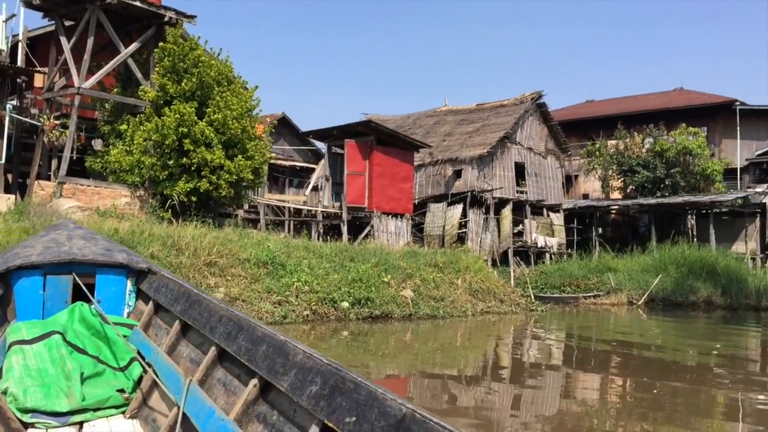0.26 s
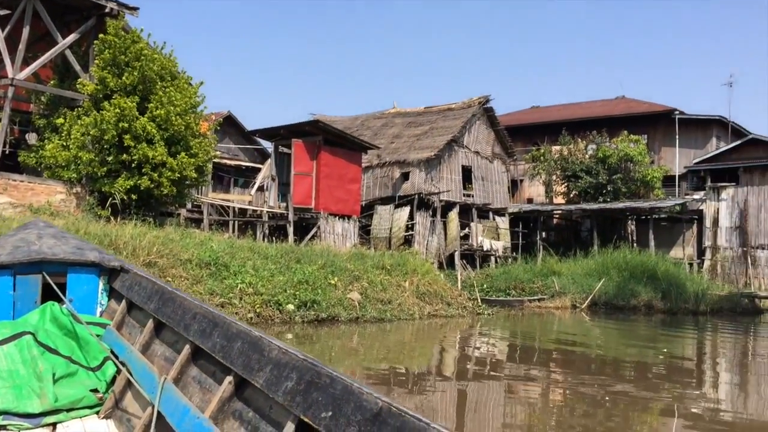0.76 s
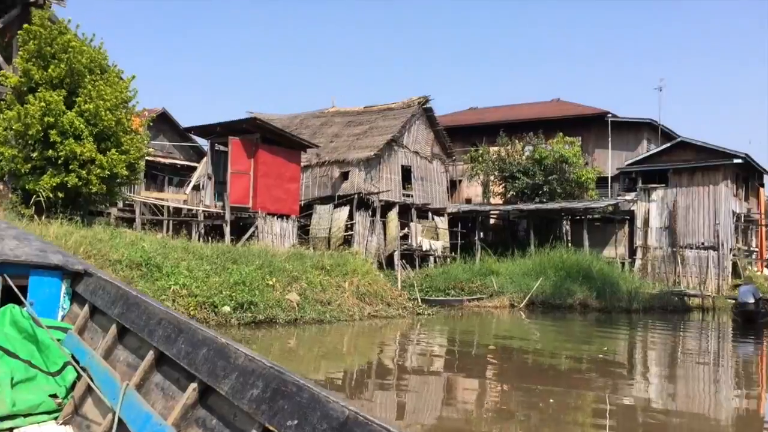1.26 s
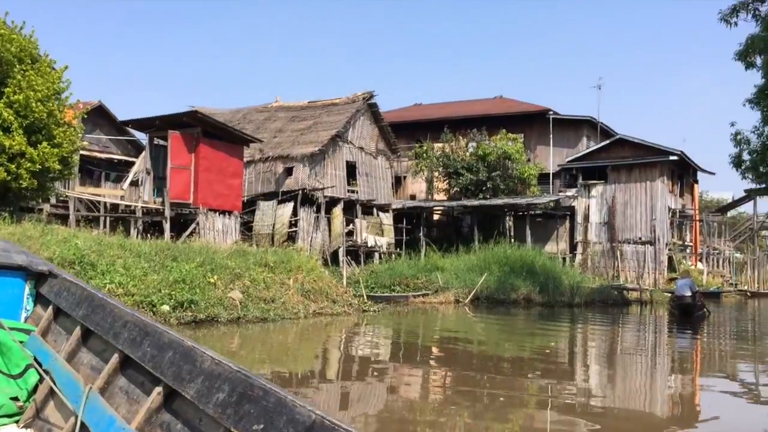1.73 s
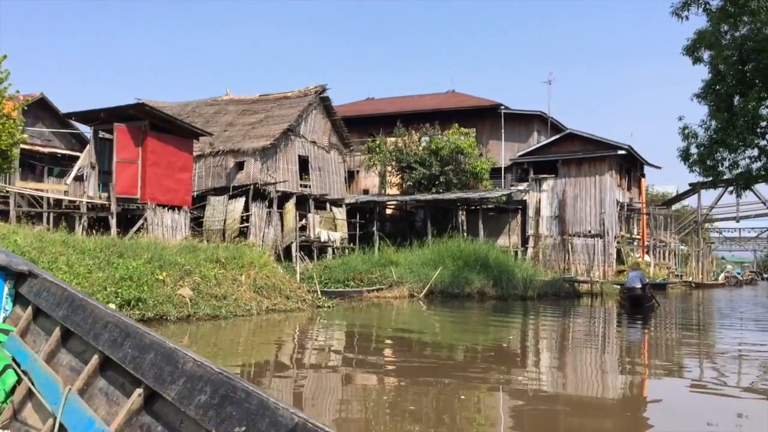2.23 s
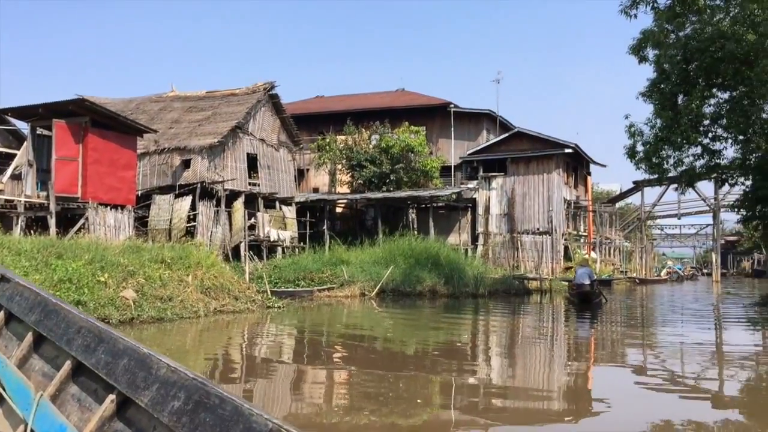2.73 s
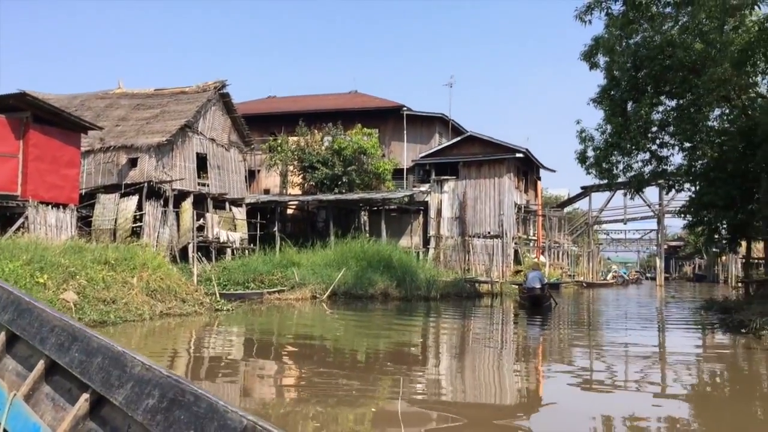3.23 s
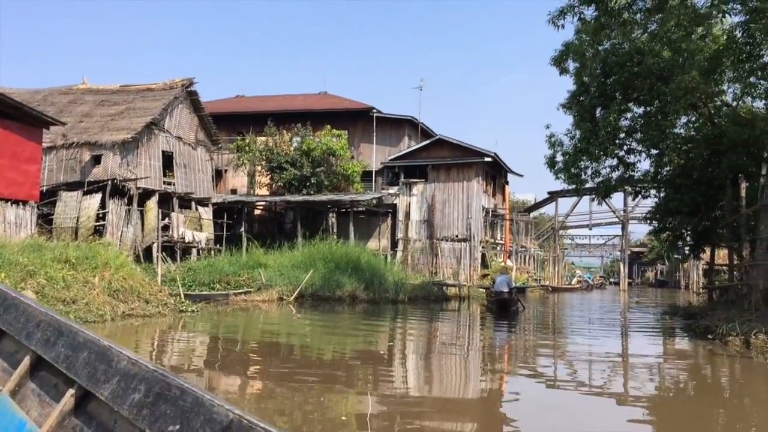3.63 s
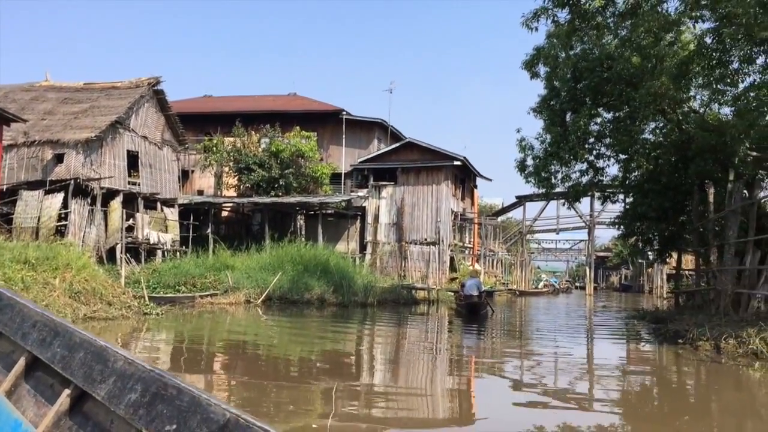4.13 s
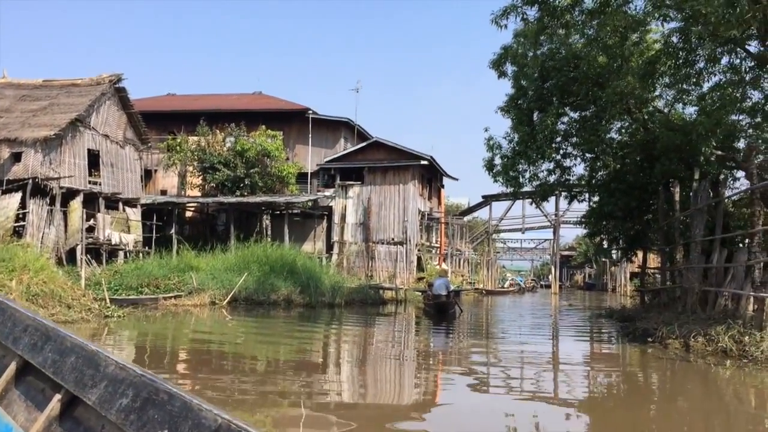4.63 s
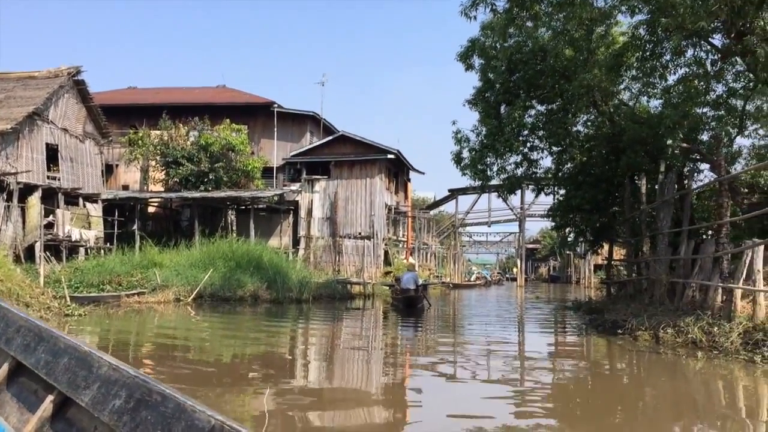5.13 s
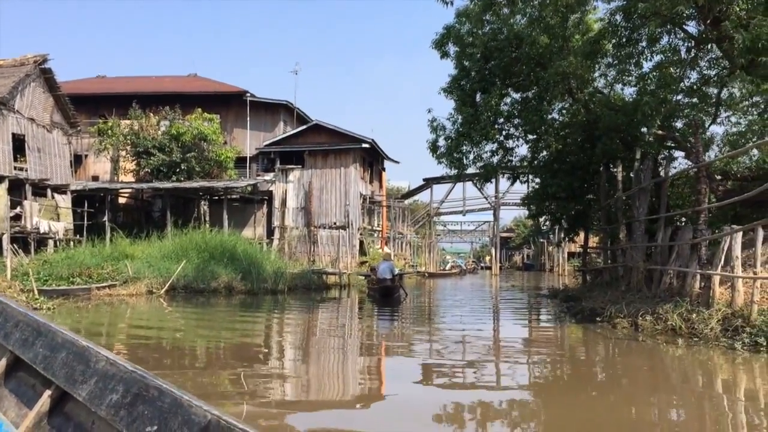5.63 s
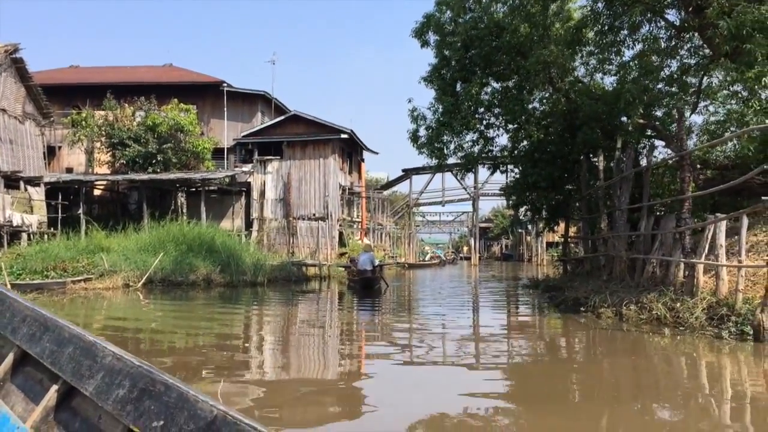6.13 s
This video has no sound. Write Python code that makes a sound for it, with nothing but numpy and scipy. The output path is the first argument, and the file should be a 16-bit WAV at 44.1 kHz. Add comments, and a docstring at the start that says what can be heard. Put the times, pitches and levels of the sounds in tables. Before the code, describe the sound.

A slow diesel engine throbs steadily, four to five beats a second, heard close up from aboard a long wooden boat in the open air. Each beat starts with an exhaust chuff, followed by low booms in the hull planks, engine clatter, clanking covers and short high squeaks. Harder beats shake loose metal fittings into brief rattles. Underneath, the hull drones and a soft hiss of machinery and water continues throughout.

```python
"""A slow boat diesel throbs four to five times a second, heard from aboard its long wooden hull.
Each throb opens with an exhaust chuff, then a run of blows makes the planks boom, the engine
clatter, its covers clank and a rubbing joint squeak. Hard throbs shake loose metal fittings into
a rattle; between the throbs the hull drones on under a wash of machine hiss and water."""
import sys
import numpy as np
from scipy import signal
from scipy.fft import rfft, irfft
from scipy.io import wavfile

SR = 44100
rng = np.random.default_rng(int(sys.argv[2]) if len(sys.argv) > 2 else 0)


def put_to_file(sound):
    """Save the sound as 16-bit audio at rate SR, in the file named by the first command-line argument."""
    columns = np.atleast_2d(sound).T  # one column per channel
    safe = np.clip(columns, -1, 1)
    whole_steps = np.round(safe * 32767)
    wavfile.write(sys.argv[1], SR, whole_steps.astype(np.int16))


N = 280917
TIME = np.arange(N) / SR


def amp(db):
    """Decibels to gain."""
    return 10 ** (np.asarray(db) / 20)


def unit(x):
    """Scales to rms 1."""
    return x / np.sqrt(np.mean(x ** 2) + 1e-20)


def add(mix, s, sound):
    """Lays a sound into the mix from time s on."""
    start = round(s * SR)
    sound = sound[max(-start, 0):]
    part = mix[max(start, 0):][:len(sound)]
    part += sound[:len(part)]


def colour(x, spectrum, peaks=()):
    """Shapes x with a smooth EQ curve and resonant peaks on top; rms 1."""
    hz = np.fft.rfftfreq(N, 1 / SR)
    f, level = np.transpose(spectrum)
    db = np.interp(np.log(hz + 1), np.log(f + 1), level)
    for centre, width, height in peaks:
        db = db + height / (1 + (2 * (hz - centre) / width) ** 2)
    return unit(irfft(rfft(x) * amp(db), N))


def noise():
    """White noise."""
    return rng.standard_normal(N)


def wander(hz):
    """Random drift up to about the given rate; rms 1."""
    rolloff = 1 + (np.fft.rfftfreq(N, 1 / SR) / hz) ** 4
    return unit(irfft(rfft(noise()) / rolloff, N))


def grains(per_s, spread_db):
    """Dense tiny impacts of uneven size; rms 1."""
    hits = noise() * (rng.random(N) < per_s / SR)
    return unit(hits * amp(spread_db * np.minimum(rng.exponential(1, N), 4)))


def bursts(times, levels_db, rise, fall):
    """Envelope of hits with a fast attack and a dying tail; their powers add."""
    power, t = np.zeros(N), np.arange(SR // 2) / SR
    for s, db, decay in zip(times, levels_db, np.broadcast_to(fall, len(times))):
        add(power, s, (amp(db) * np.exp(-t / decay) * (1 - np.exp(-t / rise))) ** 2)
    return np.sqrt(power)


def swell(s, db, half_width):
    """Power of a smooth swell centred on time s."""
    return amp(db) ** 2 * np.exp(-np.minimum(((TIME - s) / half_width) ** 2, 100))


# The engine's groove. Each row: the throb's beat in seconds, then relative levels in dB for opening
# blows, closing blows, clatter, chuff, clank, squeak and scrape, then the lead squeak's pitch in Hz.
THROBS = [(0.025, -31, -29.5, -46, -60, -54, -48.5, -55.5, 3360),
          (.255, -26, -35.5, -52, -44, -43, -53.5, -52.5, 3900),
          (.478, -28, -32.5, -48, -43.5, -42, -54.5, -53.5, 3680),
          (.704, -33, -28, -44.5, -38, -41, -52.5, -55, 3620),
          (.92, -33.5, -25.5, -42, -48, -42.5, -51, -56, 3500),
          (1.124, -26.5, -35, -49.5, -53, -58, -52, -55.5, 3510),
          (1.327, -25.5, -37, -47, -43.5, -65, -52, -55, 3620),
          (1.538, -26.5, -26, -45, -46, -55, -52.5, -54, 3650),
          (1.742, -31, -25.5, -46.5, -43.5, -54, -52, -56, 3670),
          (1.947, -38, -31, -50, -48, -69, -66, -56, 3430),
          (2.152, -30.5, -34.5, -48, -50, -54, -51.5, -52.5, 3630),
          (2.372, -38, -26.5, -47, -51, -49.5, -51, -57, 3560),
          (2.602, -31.5, -30, -48.5, -52, -47.5, -50.5, -53, 3680),
          (2.84, -36, -30, -49, -46, -53, -51, -57, 3700),
          (3.099, -35, -28, -48.5, -48, -46, -52, -54, 4170),
          (3.361, -30, -28, -44.6, -44, -44.5, -50, -54.5, 4650),
          (3.606, -23, -38, -41, -43, -46, -58, -57, 3560),
          (3.827, -27, -28, -40.5, -43.5, -42, -50, -53, 3590),
          (4.032, -32, -26, -48.5, -53, -53, -56.5, -63, 4080),
          (4.236, -29, -32, -50.5, -49, -58, -61, -54.5, 4460),
          (4.436, -30, -22, -43.5, -39, -52, -49.5, -54, 4620),
          (4.636, -30, -32.5, -50, -45, -55, -53, -55.5, 3600),
          (4.838, -25, -35.5, -47.5, -45, -49, -53.5, -52.5, 3630),
          (5.044, -28, -29, -46, -38, -47, -50, -62.5, 4630),
          (5.247, -31, -30.5, -48.5, -51, -62, -65, -61, 4370),
          (5.451, -25, -29, -44, -43, -53.5, -50.5, -51.5, 4750),
          (5.658, -28.5, -31.5, -46.5, -51.5, -54.5, -48.5, -68, 4660),
          (5.87, -33, -33, -48, -47, -68, -69, -71, 4630), (6.07, -25, -29, -45, -39, -57, -47, -57, 4630),
          (6.284, -23, -33.5, -43, -42.5, -48, -51, -53, 3650)]
def engine_cycle():
    """Place in the engine's cycle, -0.5 to 0.5, zero on each beat."""
    beats = np.transpose(THROBS)[0]
    beats = np.r_[2 * beats[0] - beats[1], beats, 2 * beats[-1] - beats[-2]]
    turns = np.interp(TIME, beats, np.arange(len(beats)))
    return (turns + .5) % 1 - .5


# Tone of a gas puff. Each row: frequency in Hz, gain in dB.
CHUFF_EQ = [(200, -17), (450, -3.5), (800, 5), (1100, -4.5), (1500, -13), (3000, -10), (5000, -20.5),
            (15000, -53.5)]
# Ring of the exhaust pipe. Each row: centre in Hz, width in Hz, boost in dB.
PIPE_RING = [(570, 64, 9), (739, 61, 11.5), (900, 140, 10), (1133, 140, 8.5)]
def exhaust():
    """Puffs of gas bark through the pipe ahead of the beat; the harder the throb, the longer the puff."""
    beats, _, _, clatter_db, chuff_db = np.transpose(THROBS)[:5]
    lead_s = 0.083
    decay_s = 0.02 * amp(0.8 * (clatter_db - clatter_db.mean()))
    puffs = bursts(beats - lead_s, chuff_db, rise=0.0088, fall=decay_s)
    return puffs * colour(noise(), CHUFF_EQ, PIPE_RING) * amp(3.5)


# The blows in every throb. Each row: place in cycles, trim in dB, hull pitch in Hz, attack in seconds.
BLOWS = [(-.345, -1, 75.9, .012), (-.32, -3, 145, .008), (-.24, 1.5, 116, 0.015), (-.2, -4, 62.5, 0.019),
         (-.11, 3.5, 65.6, 0.012), (.01, -0.5, 130, 0.0093), (0.113, -4, 100.7, 0.021)]
def hull_booms():
    """Each blow swells and dies in a few swings of the hull."""
    beats, opening_db, closing_db = np.transpose(THROBS)[:3]
    out, t = np.zeros(N), np.arange(SR // 6) / SR
    for beat, period, opening, closing in zip(beats, np.gradient(beats), opening_db, closing_db):
        for place, trim_db, hz, attack in BLOWS:
            late, size, detune = rng.standard_normal(3)
            force_db = opening if place < -1 / 6 else closing
            gain = amp(force_db + trim_db + 0.19 * size)
            envelope = (t / attack) ** 2 * np.exp(2 - 2 * t / attack)
            swing = np.sin(2 * np.pi * hz * (1 + 0.02 * detune) * t)
            add(out, beat + place * period + 0.00098 * late, gain * envelope * swing)
    # the planks radiate little of the slowest motion
    return signal.sosfilt(signal.butter(2, 38, "highpass", fs=SR, output="sos"), out)


# The engine's shake over one cycle. Each row: place in cycles, rumble and clatter, both in relative dB.
SHAKE = [(-.44, -5.5, -12.5), (-.35, -2, -3.5), (-.2, 4, 0), (-.1, 1, 5), (0, -0.5, 3.5), (.08, 0.5, 1),
         (.2, -4, -2), (.35, -5.5, -6.5)]
# Tone of the shuddering planks. Each row: frequency in Hz, gain in dB.
RUMBLE_EQ = [(10, -42.5), (25, -17), (40, -14.5), (58, 1), (80, 1.5), (100, -3.5), (135, -1), (170, -3.5),
             (220, -8), (260, -14), (315, -15), (380, -25.5), (480, -25), (2000, -91)]
# Hollow of the hull. Each row: centre in Hz, width in Hz, boost in dB.
HULL_RING = [(78.5, 6.9, 5.5), (127.3, 25, 7), (201.4, 41, 2.5), (266.5, 90, 3)]
def hull_rumble(place):
    """The planks keep shuddering after the blows."""
    beats, opening_db, closing_db = np.transpose(THROBS)[:3]
    force_db = (opening_db + closing_db) / 2
    effort_db = np.interp(TIME, beats, force_db - force_db.mean())
    places, shake_db, _ = np.transpose(SHAKE)
    swing_db = 0.72 * effort_db + np.interp(place, places, shake_db, period=1)
    shudder = colour(noise(), RUMBLE_EQ, HULL_RING)
    # the water damps the slowest motion soonest, so the low end pumps a little harder
    deep = signal.sosfiltfilt(signal.butter(4, 92, fs=SR, output="sos"), shudder)
    return (shudder - deep) * amp(-32.5 + swing_db) + deep * amp(-31.5 + 1.1 * swing_db)


# Swells of a droning plank. Each row: peak in seconds, relative level in dB, half-width in seconds.
DRONE_SWELLS = [(0.774, -34.5, 0.015), (1.017, -32.5, 0.038), (1.835, -34, 0.033), (2.687, -33.5, 0.022),
                (2.999, -32.5, 0.038), (3.92, -35.5, 0.042), (4.718, -33, 0.034)]
def plank_drone():
    """One plank hums on a wavering note and swells between some throbs."""
    hz, rest_db = 211 + 16 * wander(21.5), -47
    power = amp(rest_db) ** 2 + sum(swell(*row) for row in DRONE_SWELLS)
    flutter = amp(2.2 * wander(31) - 1.65)
    return np.sin(2 * np.pi * np.cumsum(hz) / SR) * np.sqrt(power) * flutter


def shaking(place):
    """How hard the engine shakes its metal, in dB, from the throb's force and the place in the cycle."""
    beats, _, _, clatter_db = np.transpose(THROBS)[:4]
    places, _, shake_db = np.transpose(SHAKE)
    effort_db = np.interp(TIME, beats, clatter_db - clatter_db.mean())
    return 1.19 * effort_db + np.interp(place, places, shake_db, period=1)


# Early reflections off the planks. Each row: delay in seconds, level in dB against the direct sound.
PLANK_ECHOES = [(.0027, -21.5), (.0041, -21.5), (.0054, -10), (.0073, -18), (.0092, -11)]
def reflect(x):
    """Near planks return a sound within milliseconds and make it hollow; the power is kept."""
    out = x.copy()
    for delay, db in PLANK_ECHOES:
        add(out, delay, amp(db) * x)
    return out * x.std() / out.std()


# Tone of the engine's clatter. Each row: frequency in Hz, gain in dB.
CLATTER_EQ = [(100, -32.5), (280, 6.5), (400, -1), (480, -2.5), (600, -1.5), (900, -3), (1300, -6),
              (1900, -9), (2600, -22.5), (3800, -17.5), (5200, -33.5), (7000, -39.5), (10000, -45),
              (15000, -48.5)]
# Ring of the engine block and its covers. Each row: centre in Hz, width in Hz, boost in dB.
BLOCK_RING = [(610.3, 80, 10.5), (722, 49, 1.5), (865, 107, 2.5), (1210, 240, 0.5), (1630, 20, 2),
              (1716, 20, 6), (2282, 130, 6), (2900, 23, 12)]
def engine_clatter(place):
    """Tiny impacts ring the block while it shakes."""
    level_db = -49 + shaking(place) + 1.1 * wander(50)
    impacts = reflect(grains(per_s=6000, spread_db=1.7))
    return colour(impacts, CLATTER_EQ, BLOCK_RING) * amp(level_db)


# Tone of the machine and water bed. Each row: frequency in Hz, gain in dB.
WASH_EQ = [(100, -27), (300, 6.5), (450, -4), (650, 3), (1000, 6), (1400, 3.5), (2300, 0), (3000, -6),
           (4100, -9), (5100, -21), (6500, -20.5), (9000, -31), (11000, -32), (15000, -34)]
# Fader ride on that bed. Each row: time in seconds, relative level in dB.
WASH_RIDE = [(0, -53.5), (2.2, -53), (3.3, -57), (3.8, -52.5), (5.6, -52.5), (6.37, -50.5)]
def wash():
    """Steady hiss of the running machine and of water along the hull."""
    ride_db = np.interp(TIME, *np.transpose(WASH_RIDE))
    hiss = colour(grains(per_s=7000, spread_db=1.4), WASH_EQ, BLOCK_RING)
    return hiss * amp(ride_db - 1.87 + 2.03 * wander(24))


# Light scrapes as the engine rocks. Each row: offset from the beat in seconds, trim in dB,
# pitch in Hz, timing scatter in seconds.
SCRAPES = [(-.068, -2, 2820, .003), (.035, 0.5, 2590, .001), (.084, -1.5, 2520, .002),
           (.116, -1, 2498, 0.0033)]
def joint_slips():
    """Each lurch rubs the joint into three squeaks and a few scrapes; yields seconds, dB and Hz."""
    squeak_hz, gap_s = 3586, .034
    for beat, *_, squeak_db, scrape_db, lead_hz in THROBS:
        lead_db = squeak_db - 2.5 - .0058 * (lead_hz - squeak_hz)  # weaker when it jumps higher
        yield beat - gap_s, lead_db, lead_hz
        yield beat, squeak_db, squeak_hz
        yield beat + gap_s, squeak_db - 12.5, squeak_hz  # the rebound
        for offset, trim_db, hz, scatter in SCRAPES:
            yield beat + offset + scatter * rng.standard_normal(), scrape_db + trim_db, hz


# Tone of the grit under every slip. Each row: frequency in Hz, gain in dB.
GRIT_EQ = [(800, -19.5), (2000, 0.5), (2900, 3), (4200, -9), (5500, -17), (9000, -26.5), (15000, -29)]
def joint_squeaks():
    """The joint slips for a few milliseconds: a rough, gritty chirp that sags in pitch."""
    out, t = np.zeros(N), np.arange(-SR // 80, SR // 80) / SR
    envelope = np.exp(-.5 * (t / 0.003) ** 2)
    jitter = wander(490)
    grit = colour(grains(per_s=5000, spread_db=1.1), GRIT_EQ)
    for s, db, hz in joint_slips():
        size, detune = rng.standard_normal(2)
        now = (round(s * SR) + np.arange(len(t))) % N
        # light, low slips scrape and fall; hard, high ones sing
        light = np.interp(hz, [2850, 3400], [1, 0])
        roughness = light * .075 + (1 - light) * 0.023
        sag_per_s = light * 16.16 + (1 - light) * 4
        pitch = hz * (1 + 0.0097 * detune - sag_per_s * t + roughness * jitter[now])
        phase = 2 * np.pi * np.cumsum(pitch) / SR
        second_mode = amp(-22.5 - 6.8 * light) * np.sin(1.93 * phase)
        chirp = np.sin(phase) + second_mode + amp(-13 + 5 * light) * grit[now]
        add(out, s + t[0], amp(db + 4.5 + 1.1 * size) * envelope * chirp)
    return out


# The covers' double hit. Each row: offset from the beat in seconds, trim in dB, half-width in seconds.
CLANK_HITS = [(-.026, -10.5, 0.0078), (-.003, -0.5, 0.0065)]
# Tone of the covers. Each row: frequency in Hz, gain in dB.
CLANK_EQ = [(300, -28), (700, -1.5), (1100, -7), (1650, 7.5), (2100, -3.5), (2800, -15), (4500, -17),
            (6000, -50), (15000, -63)]
def cover_clanks():
    """The covers chatter twice a throb as the engine lurches on its bed."""
    power = sum(swell(beat + offset, clank_db + trim_db, half_width)
                for beat, _, _, _, _, clank_db, *_ in THROBS
                for offset, trim_db, half_width in CLANK_HITS)
    chatter = colour(grains(per_s=5000, spread_db=1.1), CLANK_EQ, BLOCK_RING)
    return np.sqrt(power) * chatter * amp(2.5)


# Knocks of loose metal. Each row: start in seconds, click level in relative dB, click decay in seconds,
# jingle level in relative dB.
KNOCKS = [(.445, -65, .0055, -69), (.6739, -56, 0.0031, -56), (0.6866, -50, .0034, -64),
          (0.8855, -55.5, 0.0064, -57), (.905, -52, .0035, -68), (0.919, -65, .005, -58),
          (1.1042, -54, 0.0032, -76), (1.315, -48.5, 0.0023, -79), (1.5, -63, .0049, -62.5),
          (3.0814, -55, 0.003, -80), (3.333, -54, 0.0062, -56), (3.3798, -58, 0.0065, -63),
          (3.5734, -54.5, 0.011, -56), (3.6204, -58, .0062, -54.5), (3.793, -48.5, 0.0071, -56),
          (3.839, -58, .007, -51.5), (4.386, -67, 0.0073, -58), (4.4325, -57, .003, -59.5),
          (5.41, -72, 0.003, -70), (5.9443, -45, 0.0012, -70), (6.065, -59, 0.0018, -64),
          (6.21, -66, .005, -68), (6.269, -67, 0.0039, -62)]
# Tones of the click and of its jingling tail. Each row: frequency in Hz, gain in dB.
CLICK_EQ = [(1000, -9), (3000, 5), (5000, 0), (6500, 3.5), (10000, -9.5), (12500, -4), (15000, -12)]
JINGLE_EQ = [(1000, -18), (3000, 12.5), (5000, -4), (6500, 0.5), (9000, -11.5), (10500, -10),
             (12500, -15.5), (15000, -22)]
# Bright ring of the fittings. Each row: centre in Hz, width in Hz, boost in dB.
METAL_RING = [(5030, 87, -2.5), (6300, 67, 10), (6630, 80, 0), (7790, 80, 7), (8300, 140, 11.5),
              (8350, 55, 0), (8890, 41, 13), (9270, 35, 16), (9140, 49, 4.5), (10700, 45, 3.5),
              (11000, 60, 5), (11350, 100, 11), (12400, 120, 0)]
def loose_fittings(place):
    """Loose metal clicks, then jingles down; the shaking keeps it sizzling lightly."""
    starts, click_db, click_decay, jingle_db = np.transpose(KNOCKS)
    snaps = bursts(starts, click_db, rise=0.00045, fall=click_decay)
    clicks = snaps * colour(noise(), CLICK_EQ, METAL_RING) * amp(3.5)
    tails = bursts(starts, jingle_db, rise=.003, fall=0.058)
    sizzle = amp(-84 + shaking(place))
    jingle = colour(reflect(grains(per_s=3000, spread_db=2.4)), JINGLE_EQ, METAL_RING)
    flicker = amp(-0.5 + 1.9 * wander(45))
    return clicks + (tails + sizzle) * jingle * flicker


def scene():
    """Engine, hull and water in one open-air mono mix."""
    place = engine_cycle()
    body = exhaust() + hull_booms() + hull_rumble(place) + plank_drone() + engine_clatter(place)
    return (body + wash() + joint_squeaks() + cover_clanks() + loose_fittings(place))[None]


def record(dry):
    """A steep high cut takes off the very top."""
    cutoff_hz = 15300
    high_cut = signal.firwin(511, cutoff_hz, window=("kaiser", 9), fs=SR)
    return signal.oaconvolve(dry, high_cut[None], "same")


dry = scene()
out = record(dry)
put_to_file(out)
```